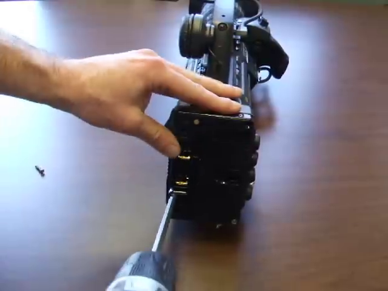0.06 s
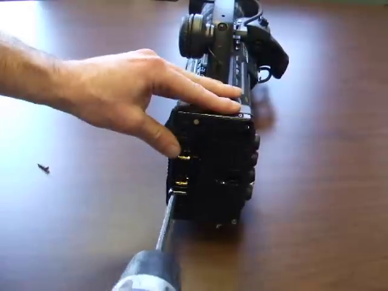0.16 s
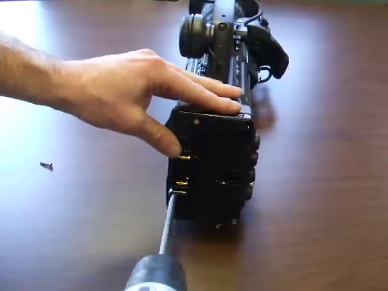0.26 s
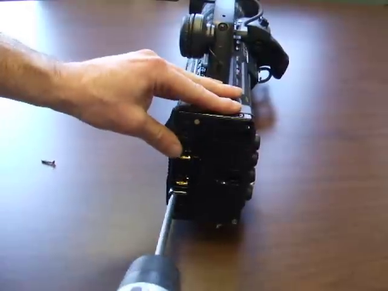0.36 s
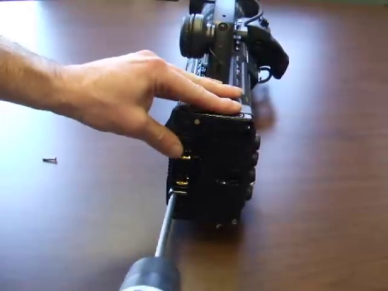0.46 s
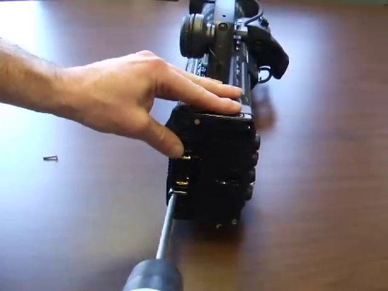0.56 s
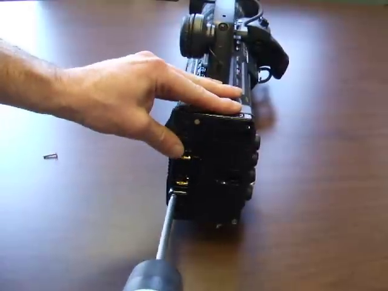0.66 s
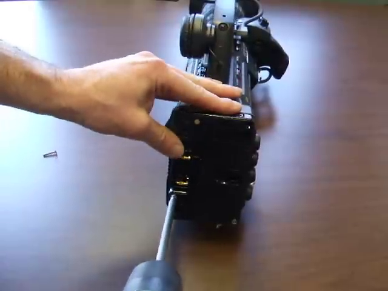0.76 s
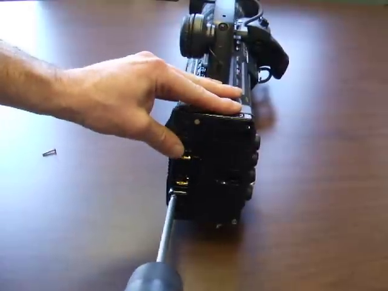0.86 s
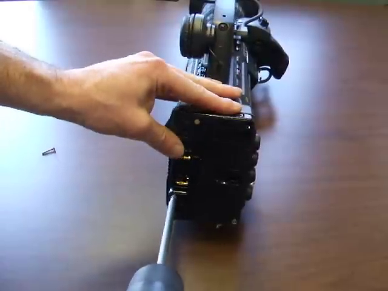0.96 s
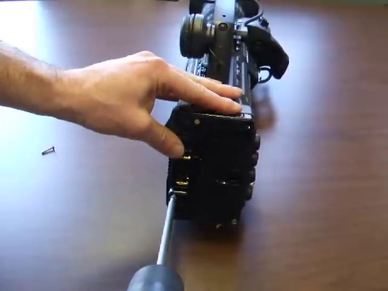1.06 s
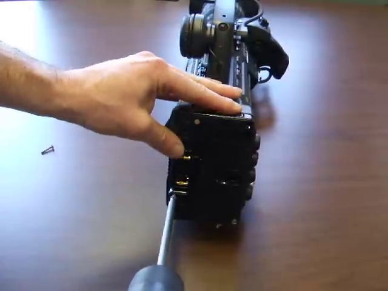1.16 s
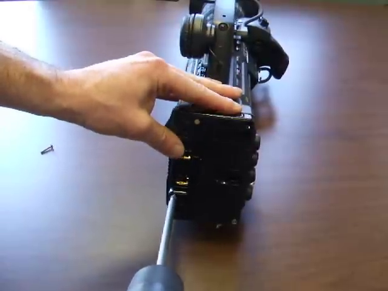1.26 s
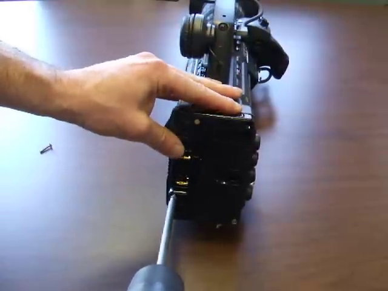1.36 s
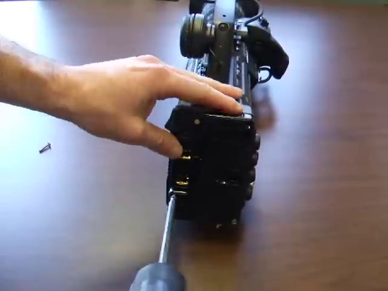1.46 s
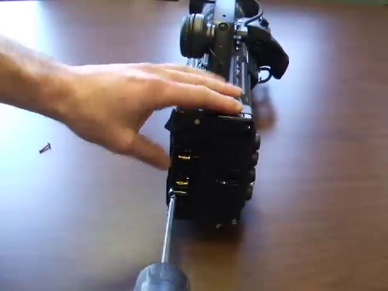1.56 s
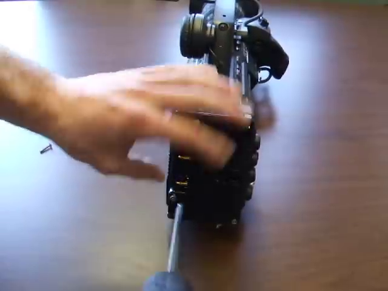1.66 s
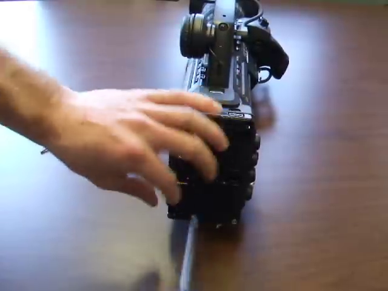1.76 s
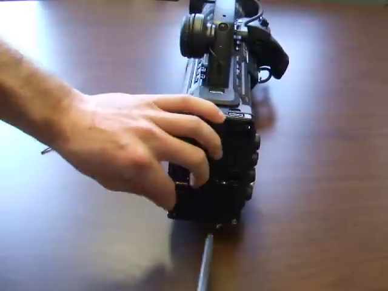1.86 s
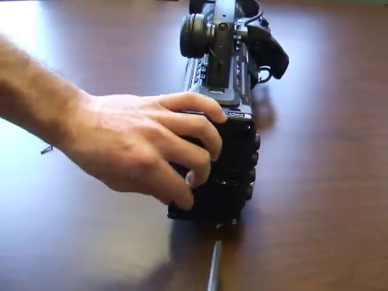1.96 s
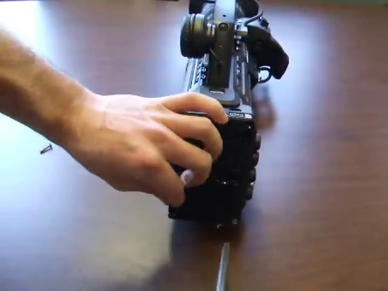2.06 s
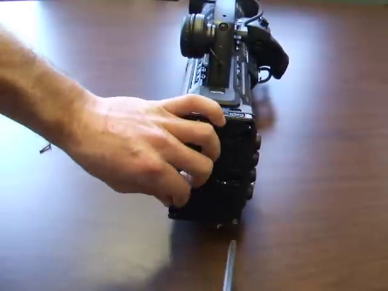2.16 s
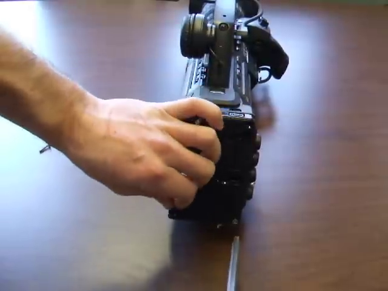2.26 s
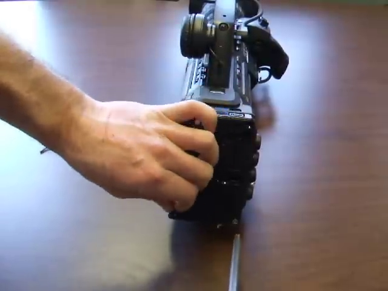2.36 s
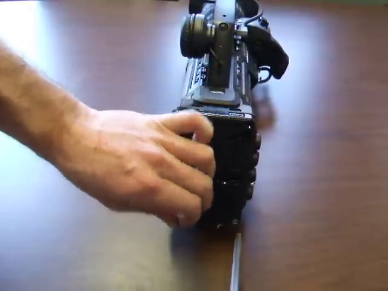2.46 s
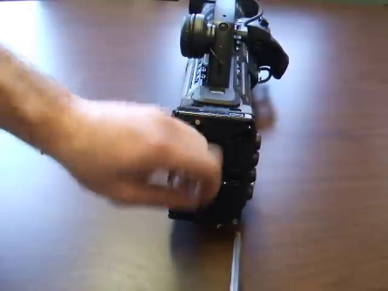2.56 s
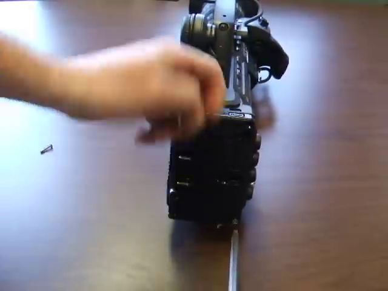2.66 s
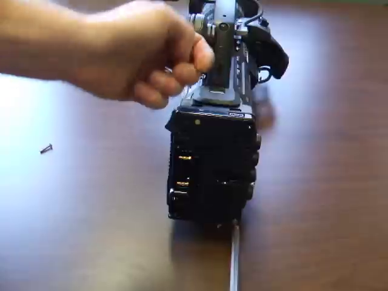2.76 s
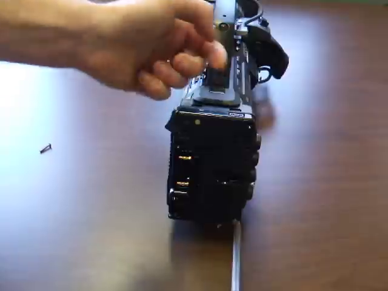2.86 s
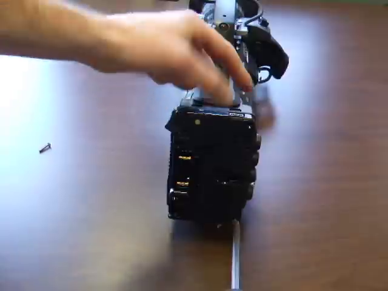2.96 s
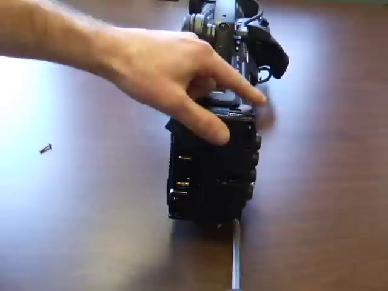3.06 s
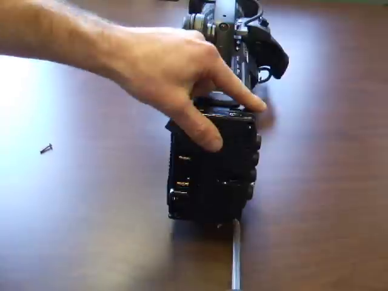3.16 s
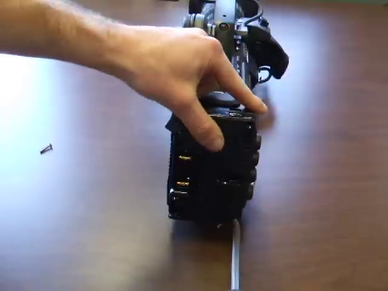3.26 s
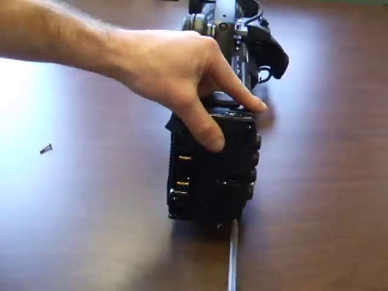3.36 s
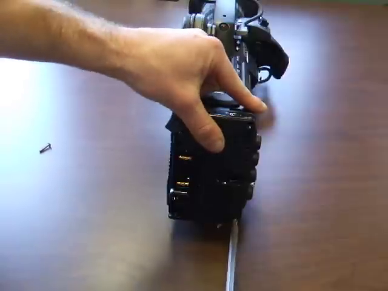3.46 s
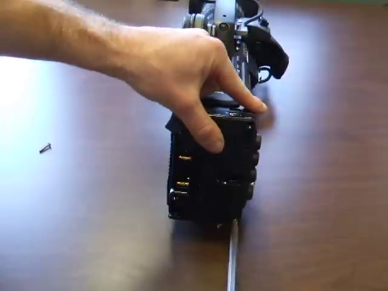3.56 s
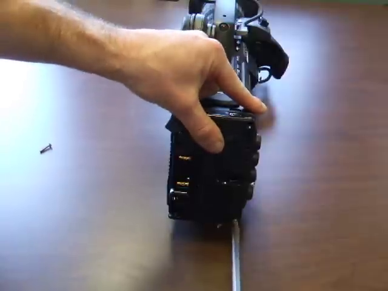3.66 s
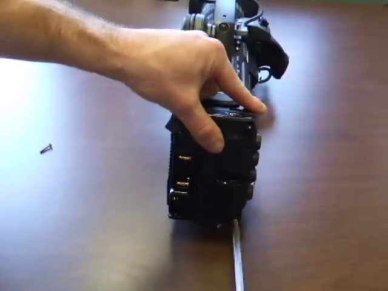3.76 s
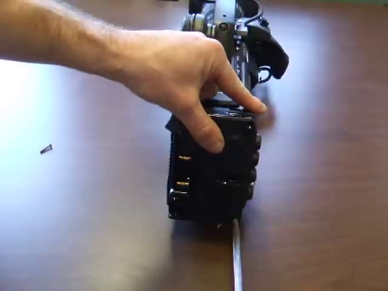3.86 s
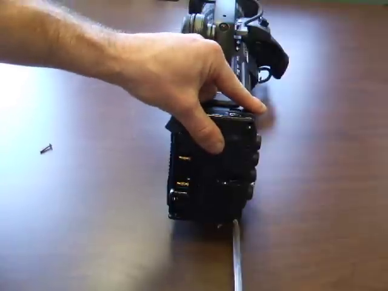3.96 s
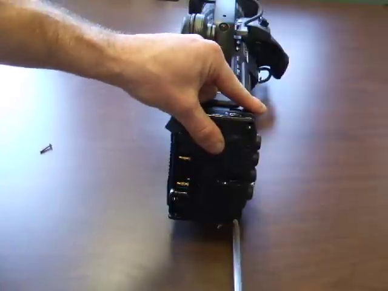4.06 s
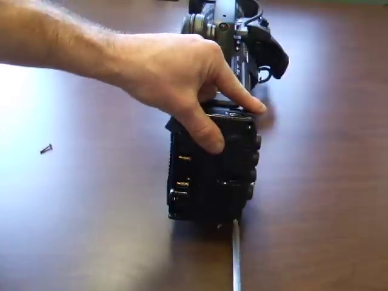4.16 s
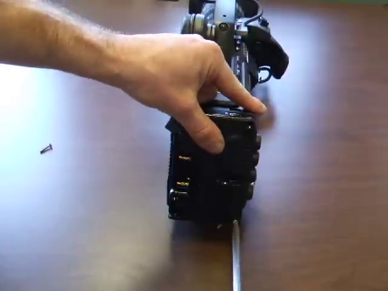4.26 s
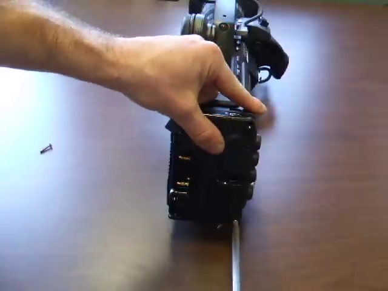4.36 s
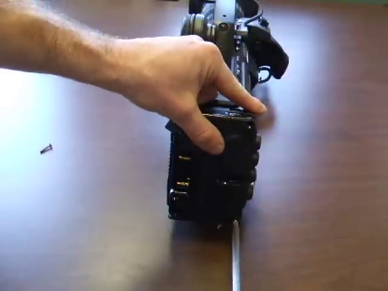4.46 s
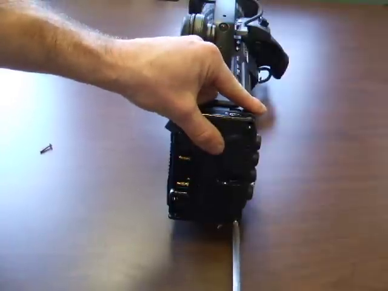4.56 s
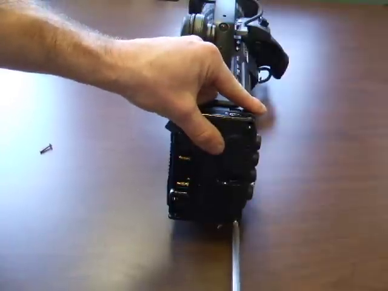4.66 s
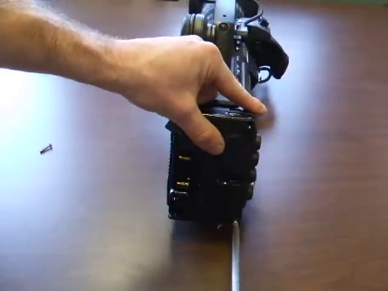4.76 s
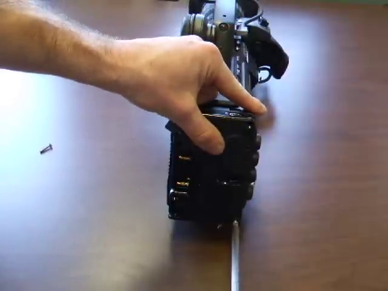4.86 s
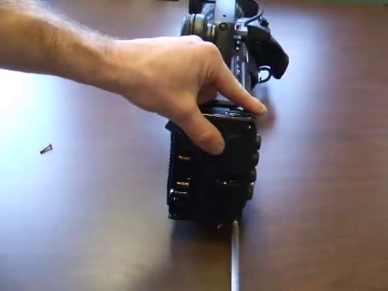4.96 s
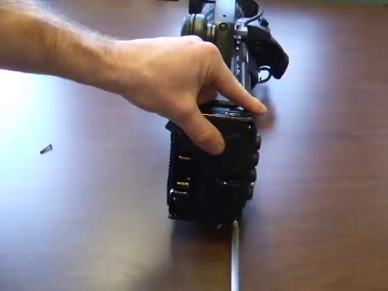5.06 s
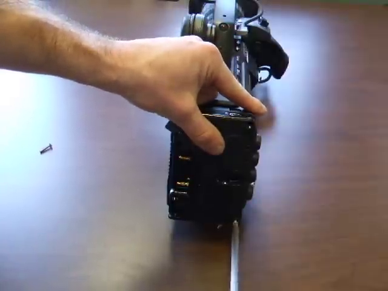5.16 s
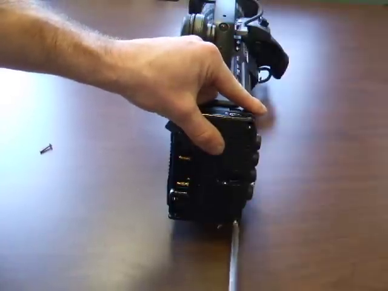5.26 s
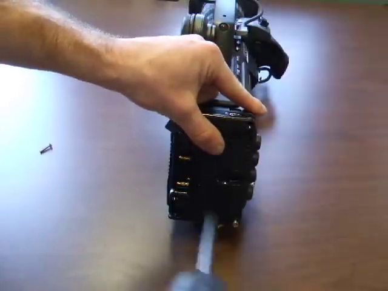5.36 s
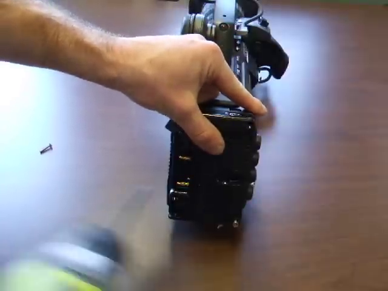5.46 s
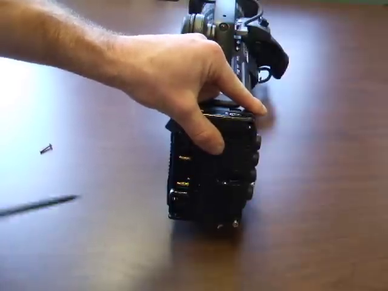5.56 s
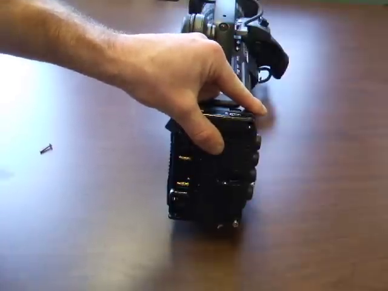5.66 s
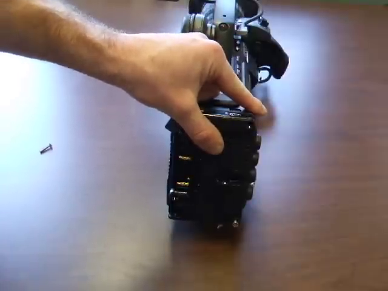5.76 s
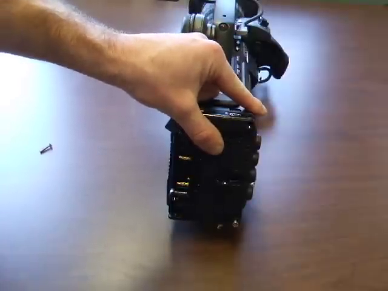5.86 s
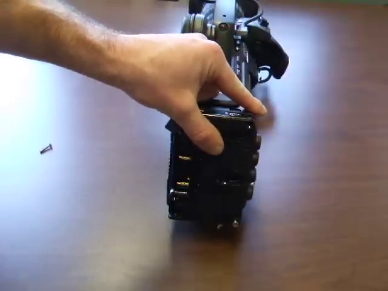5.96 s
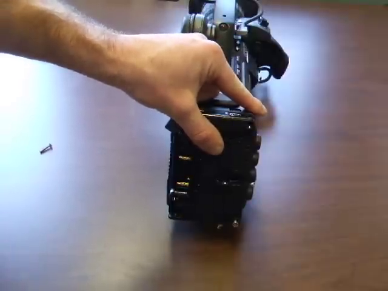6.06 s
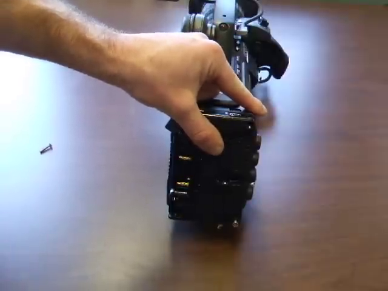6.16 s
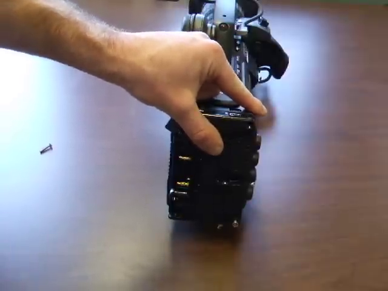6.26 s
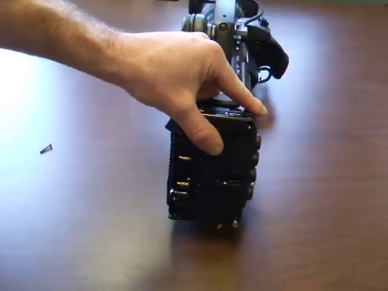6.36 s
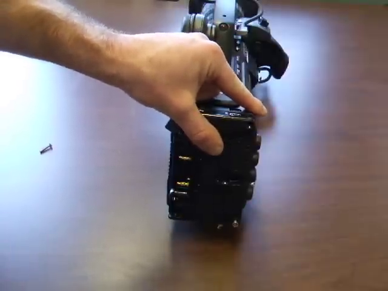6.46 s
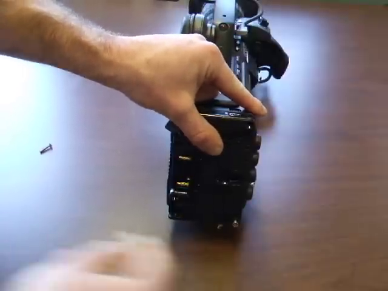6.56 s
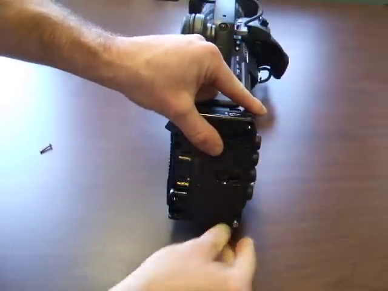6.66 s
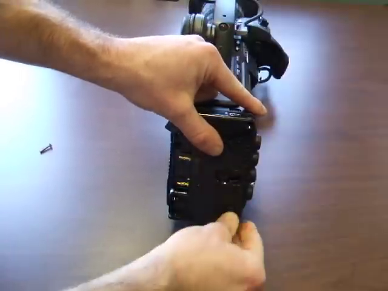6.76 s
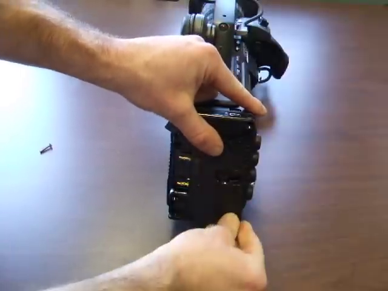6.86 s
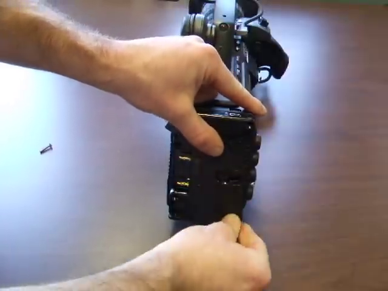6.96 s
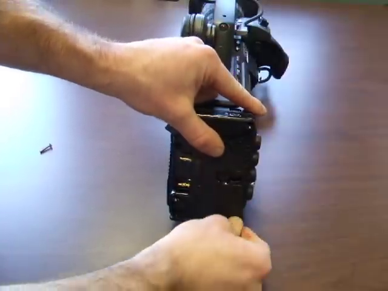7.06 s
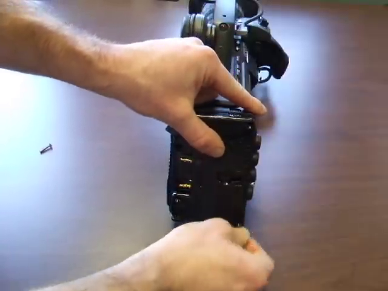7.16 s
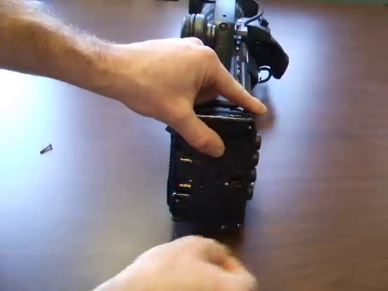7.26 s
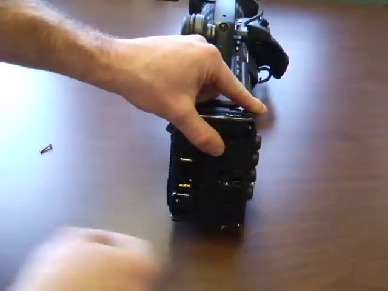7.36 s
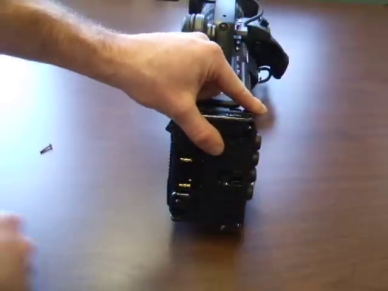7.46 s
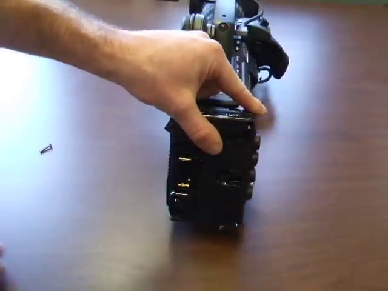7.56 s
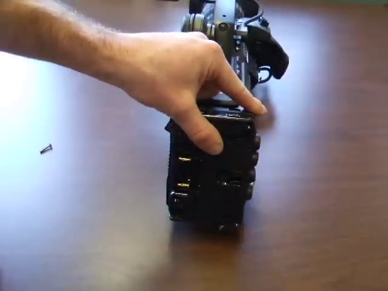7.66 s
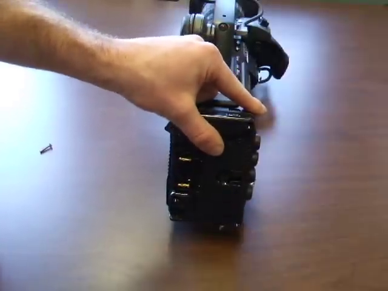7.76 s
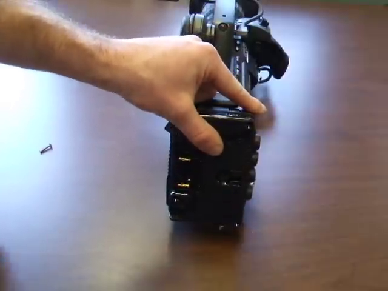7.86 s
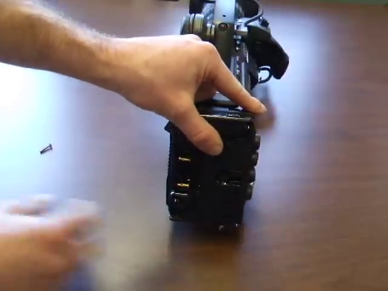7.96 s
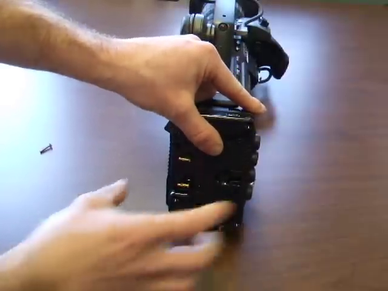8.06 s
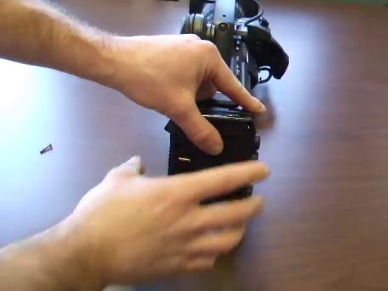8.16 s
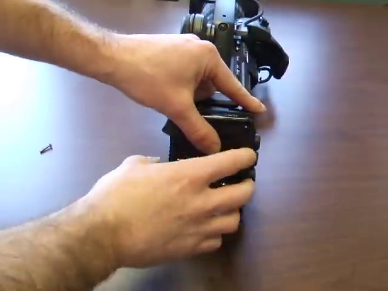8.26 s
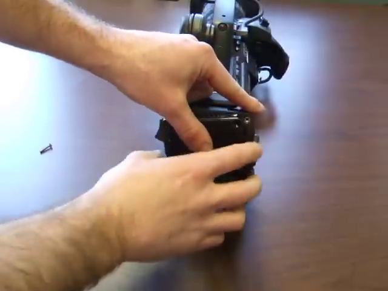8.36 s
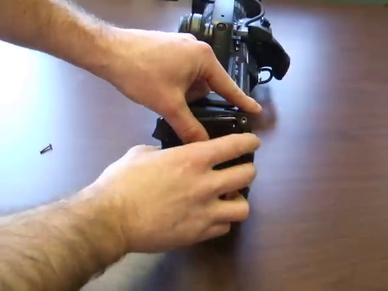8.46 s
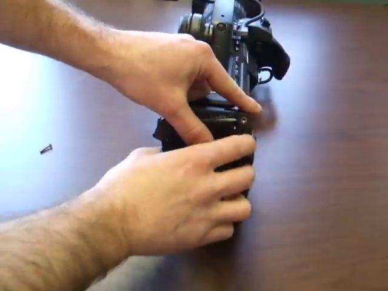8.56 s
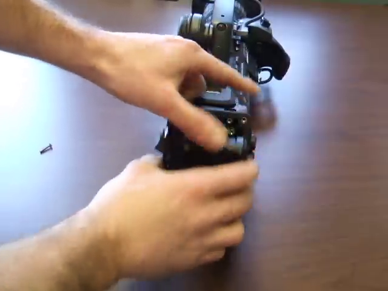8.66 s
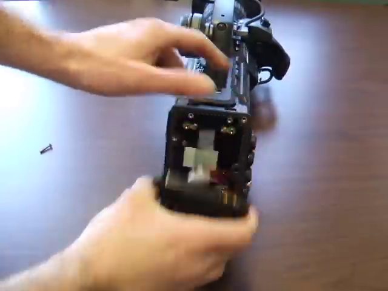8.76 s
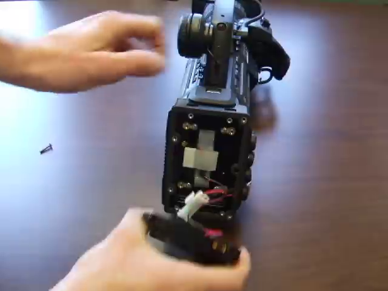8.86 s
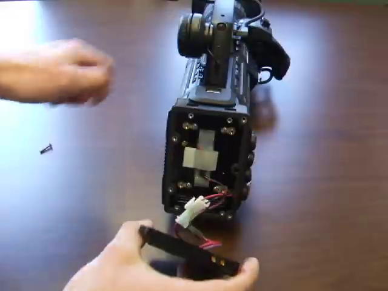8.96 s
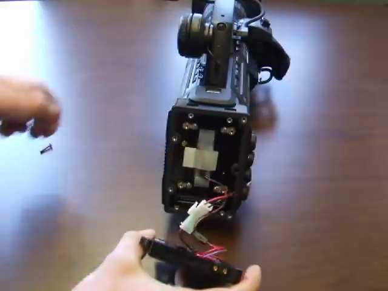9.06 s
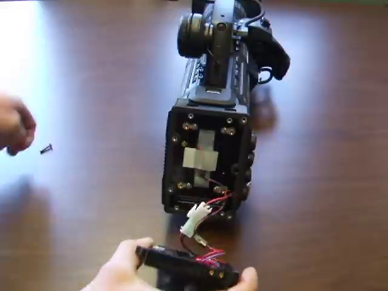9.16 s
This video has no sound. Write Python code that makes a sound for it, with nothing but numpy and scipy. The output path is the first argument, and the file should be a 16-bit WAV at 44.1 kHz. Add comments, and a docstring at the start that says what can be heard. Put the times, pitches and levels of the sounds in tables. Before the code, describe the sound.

A cordless drill whines in two short runs, backing out screws, with small metallic clicks and soft knocks between.

```python
"""A cordless drill backs two screws out of a camera's battery plate on a wooden desk, in a small room.
Its motor spins up, whines at multiples of the rotor speed and brakes hard, while rattling gear teeth
excite the resonances of the housing. Impacts of loose screws ring the plate's high modes as clicks;
knocks ring the low modes of camera and desk as thuds, and sliding friction rasps. Room air, a fan,
a thin electrical whine and a faint whistle fill the pauses."""
import sys
import numpy as np
from scipy import signal
from scipy.fft import rfft, irfft
from scipy.io import wavfile
from scipy.ndimage import uniform_filter1d

SR = 44100
rng = np.random.default_rng(int(sys.argv[2]) if len(sys.argv) > 2 else 0)


def store_wav(level_fs):
    """Save 16-bit WAV to argv[1]."""
    pcm = np.round(np.clip(np.atleast_2d(level_fs), -1, 1) * 32767)
    wavfile.write(sys.argv[1], SR, pcm.T.astype(np.int16))


N = 406591
T = np.arange(N) / SR
FREQ = np.fft.rfftfreq(N, 1 / SR) + 1e-3  # Hz, offset to keep the logarithm finite

# Spectrum of the room air: frequency_hz, gain_db
AIR_SPECTRUM = [(15, -50.5), (25, -14), (65, -9), (168, -11), (200, -16), (249, -14), (268, -14.5),
                (426, -5.5), (784, -13.5), (1630, -17), (1800, -17), (3480, -22), (7430, -21),
                (7990, -35.5), (8600, -31), (11200, -63.5), (18900, -120)]
# Humming and hissing bands of the fan: centre_hz, width_hz, level_db
FAN_BANDS = [(59, 20, -59), (372, 40, -57.5), (431, 32, -51.5), (492.5, 18, -54.5), (618, 8.9, -65.5),
             (7470, 90, -74.5), (7760, 110, -73)]
# Tones of the electrical whine: pitch_hz, level_db
WHINE_TONES = [(7854, -60.5), (7881, -82)]
# Envelope of a faint far whistle: time_s, level_db
WHISTLE_LEVELS = [(0, -66), (5.5, -69), (6.3, -60), (7.7, -57.5), (8.4, -62), (9.2, -61.5)]
# Things sliding in the hand and on the desk: start_s, length_s, level_db
SLIDES = [(3.33, 0.26, -59), (6.287, 0.16, -49.5), (6.786, 0.34, -53), (7.092, 0.11, -43),
          (7.728, 0.04, -38), (7.764, 0.07, -36.5), (7.817, .1, -50), (8.667, 0.1, -47.5)]
# Response of the wooden desk: frequency_hz, gain_db
DESK_SPECTRUM = [(30, 6.5), (65, 1), (100, 3.5), (160, 5), (210, -1), (280, 0.5), (450, -2), (800, -2.5),
                 (1400, -4), (4000, -13)]
# Knocks through camera and desk: start_s, level_db, low_edge_hz, high_edge_hz, shell_gain_db
KNOCKS = [(.227, -20, 160, 514, -7.5), (3.056, -34, 105, 300, -7), (3.36, -30, 130, 600, 0),
          (3.691, -22.5, 100, 643, 5), (6.243, -21.5, 95, 850, 1.5), (6.309, -36, 34, 130, -20),
          (8.874, -36, 250, 900, 7), (8.94, -38.5, 120, 260, -8)]
# Jolt of the drill as it brakes: level_db, low_edge_hz, high_edge_hz, shell_gain_db
BRAKE_CLUNK = (-27.5, 394, 903, 4.5)
# Resonances of the battery plate: centre_hz, width_hz, gain_db
PLATE_MODES = [(1310, 75, -13), (2030, 460, -14), (2480, 420, -12.5), (3430, 380, -15.5),
               (5190, 2200, -10.5), (6800, 280, -12)]
# Single impacts of screws, bit and plate: start_s, level_db, ping_hz, ping_gain_db
CLICKS = [(.2237, -7.5, 2280, -3), (.2342, -6, 7200, -1.5), (.2586, -10, 3330, -4), (.282, -13, 7200, -7),
          (.291, -12.5, 7600, -4), (.3167, -10.5, 4620, 2), (1.8483, -27.5, 4330, -8),
          (2.1981, -22.5, 5480, 4.5), (2.3426, -19.5, 5630, -4), (3.055, -26.5, 1390, 6),
          (3.3578, -26.5, 2460, 3), (3.375, -30, 2440, 10), (3.6886, -12.5, 1360, -14),
          (6.193, -18, 1350, -5), (6.2438, -22.5, 1140, 1), (7.016, -22, 1370, -3), (7.0218, -18, 5820, 1),
          (7.0344, -15, 5677, 3), (7.1138, -12.5, 5570, 22), (7.1601, -15.5, 6420, 5),
          (7.7875, -15.5, 7350, 4), (8.873, -19, 2680, -3), (9.0955, -31, 1590, 0)]
# A loose screw bouncing in the plate: start_s, length_s, first_gap_s, level_db, ping_hz, body_low_hz
RATTLES = [(2.299, .032, 0.011, -16, 7350, 312), (2.3997, .028, .0082, -19.5, 6040, 310),
           (7.0795, .087, .018, -20, 6250, 140)]
# Response of the drill's housing in the first run: frequency_hz, gain_db
FIRST_HOUSING = [(100, -17.5), (450, -24), (800, -18), (1080, -13), (1320, 4), (1600, -9.5), (1980, -2),
                 (2300, -9.5), (3400, -3), (4050, -3.5), (4400, -8), (6400, -1.5), (7400, 0.5),
                 (8500, -15.5)]
# Response of the housing in the second run: frequency_hz, gain_db
SECOND_HOUSING = [(100, -27.5), (450, -8.5), (850, -16), (1320, 4), (1650, -3.5), (2300, -4), (3300, -1.5),
                  (4050, -4.5), (4560, 1.5), (4850, -1.5), (5200, -5), (5800, 0.5), (6300, -4), (7450, 4),
                  (8500, -9)]
# Motor and gear tones at full speed: rotor_multiple, first_run_gain_db, second_run_gain_db
ROTOR_ORDERS = [(3, -21, -18), (4, -25, -19.5), (6, -35.5, -22.5), (9, -28, -17.5), (12, -10, -17.5),
                (14, -32.5, -29), (15, -12, -13.5), (16, -21.5, -26), (17, -20, -31), (18, -16.5, -14),
                (19, -25, -24), (20, -12.5, -23), (21, -9.5, -8.5), (22, -21, -17.5), (23, -14, -19.5),
                (24, -9, -4.5), (25, -18.5, -25)]
# Runs of the drill: start_s, screw_free_s, ease_s, brake_s, level_db, drag_decay_s, start_surge_db
DRILL_RUNS = [(.18, 0.99, 1.423, 1.468, -26, .12, 11.5), (3.967, 4.803, 5.195, 5.269, -25, .15, 14.5)]

FULL_SPEED_HZ = 313.7  # rotor turns per second
JAM_AT_S = .25  # the first screw sticks briefly
TRIGGER_LEAD_S = .033  # current flows this long before the motor turns


def undb(db):
    """Amplitude ratio of a level in decibels."""
    return 10 ** (np.asarray(db) / 20)


def unit(x):
    """Normalisation to rms 1."""
    return x / np.sqrt(np.mean(x ** 2))


def since(start_s):
    """Elapsed seconds, zero before the start."""
    return np.maximum(T - start_s, 0)


def response_db(spectrum, hz):
    """Interpolation of a spectrum on a logarithmic frequency axis."""
    points_hz, points_db = np.transpose(spectrum)
    return np.interp(np.log(hz), np.log(points_hz), points_db)


def colour(x, spectrum):
    """Filtering as multiplication in the frequency domain."""
    return irfft(rfft(x) * undb(response_db(spectrum, FREQ)), N)


def noise_band(centre_hz, width_hz):
    """White noise filtered by one spectral peak, rms 1."""
    return unit(irfft(rfft(rng.standard_normal(N)) / (1 + (2 * (FREQ - centre_hz) / width_hz) ** 2), N))


def drift(rate_hz):
    """Random fluctuation: low-pass noise, rms 1."""
    return noise_band(0, 2 * rate_hz)


def resonate(x, centre_hz, width_hz):
    """Second-order resonance, gain 1 at its centre."""
    return signal.lfilter(*signal.iirpeak(centre_hz, centre_hz / width_hz, SR), x)


def add(out, start_s, x):
    """Superposition of a short sound on a longer one."""
    i = int(start_s * SR)
    out[i:i + len(x)] += x[:N - i]


def room(x, wet_db, bass_t60_s=.67, treble_t60_s=.19):
    """Reverberation: wall reflections arrive after 5 ms and decay, the treble soonest."""
    t = T[:SR]
    noise = rng.standard_normal(SR)
    bass = signal.sosfilt(signal.butter(1, 2000, fs=SR, output="sos"), noise)
    tail = bass * undb(-60 * t / bass_t60_s) + (noise - bass) * undb(-60 * t / treble_t60_s)
    tail *= t > .005
    return x + undb(wet_db) * signal.fftconvolve(x, tail / np.linalg.norm(tail))[:N]


def background(air_db=-48, whistle_hz=1831):
    """Superposition of broadband air, narrow-band fan noise, an electrical whine and a faint whistle."""
    air = unit(colour(rng.standard_normal(N), AIR_SPECTRUM)) * undb(air_db + 1.05 * drift(2.5))
    fan = sum(undb(db) * noise_band(hz, width_hz) for hz, width_hz, db in FAN_BANDS)
    whine = sum(undb(db) * np.sqrt(2) * np.sin(2 * np.pi * hz * T) for hz, db in WHINE_TONES)
    whistle = np.sqrt(2) * np.sin(2 * np.pi * np.cumsum(whistle_hz + 14 * drift(36)) / SR)
    whistle_db = np.interp(T, *np.transpose(WHISTLE_LEVELS))
    return air + fan + whine + undb(whistle_db) * whistle


def slides(grain_db=4):
    """Sliding friction: gritty noise swells and fades over each stroke."""
    level = sum(undb(db) * np.sqrt(np.maximum(1 - (2 * (T - start_s) / length_s - 1) ** 2, 0))
                for start_s, length_s, db in SLIDES)
    grit = rng.standard_normal(N) * undb(grain_db * drift(190))
    spectrum = [(300, -1.5), (1200, -4.5), (2500, 3), (5000, 6.5), (8000, 3), (10000, -32)]
    return level * unit(colour(grit, spectrum))


def thuds(hits, shell_hz=1200, shell_t60_s=.099):
    """Damped vibration: a knock rings the desk's dense low modes, and the camera's shell clacks."""
    out, t = np.zeros(N), T[:SR]
    desk = colour(rng.standard_normal(N), DESK_SPECTRUM)
    attack = 1 - np.exp(-t / .00044)
    for start_s, db, low_hz, high_hz, shell_db in hits:
        wood = desk[rng.integers(N - SR):][:SR]
        t60_s = .43 * (100 / low_hz) ** .72  # higher knocks die sooner
        low = signal.sosfilt(signal.butter(2, [low_hz, high_hz], "bandpass", fs=SR, output="sos"), wood)
        shell = resonate(wood, shell_hz, shell_hz / 2) + resonate(wood, 3100, 210)
        thud = low * undb(-60 * t / t60_s) + undb(shell_db) * shell * undb(-60 * t / shell_t60_s)
        add(out, start_s, undb(db) * thud * attack / (2.68 * np.std(thud[:SR // 20])))
    return out


def clicks(hits, contact_s=.0015, t60_s=.016, crack_db=-19):
    """Impact excitation: a brief scrape rings the plate's modes, and each contact adds its own ping."""
    out, t = np.zeros(N), T[:SR // 10]
    fade = undb(-60 * np.maximum(t - contact_s, 0) / t60_s)
    for start_s, db, ping_hz, ping_db in hits:
        force = rng.choice([-1, 1], len(t)) * fade
        # hard metal contacts favour the high modes, plastic ones the low
        tilt_db_per_octave = 4 * np.log2(ping_hz / 3500)
        plate = sum(undb(gain_db + tilt_db_per_octave * np.log2(hz / 3500)) * resonate(force, hz, width)
                    for hz, width, gain_db in PLATE_MODES)
        ping = undb(ping_db - 13) * fade * np.sin(2 * np.pi * ping_hz * t)
        click = plate + undb(crack_db) * force + ping
        add(out, start_s, undb(db) * click / (2.44 * np.std(click[:SR // 300])))
    return out


def screw_bounces(restitution=.86, scatter_db=2.5, detune=.057):
    """Inelastic bouncing: ever quicker impacts, listed as pings of the plate and nudges of the body."""
    pings, nudges = [], []
    for start_s, length_s, gap_s, level_db, ping_hz, body_hz in RATTLES:
        delays = np.cumsum(np.r_[0, gap_s * restitution ** np.arange(10)])
        levels = level_db + scatter_db * rng.standard_normal(len(delays))
        pitches = ping_hz * (1 + detune * rng.standard_normal(len(delays)))
        for delay_s, db, hz in zip(delays, levels, pitches):
            if delay_s < length_s:
                pings.append((start_s + delay_s, db, hz, 1.5))
                nudges.append((start_s + delay_s, db - 22, body_hz, 2 * body_hz, -6))
    return pings, nudges


def camera_rumble(speed, torque, loose, kick_db=-35, wobble_db=-41.5):
    """Forced vibration: the camera body shakes as the motor speeds up, and under a loose screw."""
    level = speed * (undb(kick_db) * np.maximum(torque, 0) + undb(wobble_db) * loose ** 2)
    shake = rng.standard_normal(N) * undb(1.8 * drift(25))
    return level * unit(colour(shake, [(50, -30.5), (130, 2.5), (240, -6), (400, -5.5), (900, -50)]))


def current_pulse(start_s, length_s=.053):
    """Switching transient: current swells briefly as the trigger closes, just ahead of the motor."""
    return np.sin(np.pi * np.minimum(since(start_s - TRIGGER_LEAD_S) / length_s, 1)) ** 2


def trigger_squeal(start_s, settled_hz=5270, drop_hz=2000, drop_s=.009, level_db=-34.5):
    """Current chopping: the speed control sings at each pull, its pitch settling from above."""
    hz = settled_hz + drop_hz * np.exp(-since(start_s - TRIGGER_LEAD_S) / drop_s)
    hz *= 1 + .0048 * drift(93)
    return undb(level_db) * current_pulse(start_s) * np.sin(2 * np.pi * np.cumsum(hz) / SR)


def motor_speed(start_s, ease_s, brake_s, drag_decay_s, spin_lag_s=.029, brake_lag_s=.038):
    """First-order lag under load: the share of full speed from spin-up to braking."""
    spin_up = 1 - np.exp(-since(start_s) / spin_lag_s)
    thread_drag = .22 * np.exp(-since(start_s) / drag_decay_s)
    jam = .55 * np.exp(-(np.minimum(T - JAM_AT_S, 0) / .022) ** 2 - since(JAM_AT_S) / .04)
    finger_lift = np.maximum(1 - 1.05 * since(ease_s), 0)
    braking = np.exp(-since(brake_s) / brake_lag_s)
    return spin_up * (1 - thread_drag) * (1 - jam) * finger_lift * braking


def gear_tones(run, housing, speed, rotor_hz, angle):
    """Rotational harmonics: each tone swells as its glide crosses a resonance of the housing."""
    tones = 0
    for order, *gains_db in ROTOR_ORDERS:
        swell_db = response_db(housing, order * rotor_hz) - response_db(housing, order * FULL_SPEED_HZ)
        waver_db = (.6 + order / 18) * drift(18)
        phase = order * angle + rng.uniform(0, 2 * np.pi)
        tones += undb(gains_db[run] + swell_db + waver_db) * np.sin(phase)
    return tones * np.sqrt(2) * speed ** 5  # the gears sing cleanly only near full speed


def gear_rattle(housing, angle, depth=.084, grain_db=1.5):
    """Amplitude modulation: teeth strike harder as each planet gear comes round, and once a turn."""
    mesh = 1 + depth * np.cos(.847 * angle) + depth / 2 * np.cos(angle)
    return unit(colour(rng.standard_normal(N) * mesh * undb(grain_db * drift(350)), housing))


def motor_strain(torque, rotor_hz, angle, growl_db, pinion_db):
    """Torque reaction: three rotor poles and the pinion tug at the housing as the speed changes."""
    growl = np.exp(-((rotor_hz - 175) / 55) ** 2) * (np.sin(3 * angle) + .6 * np.sin(9 * angle))
    pinion = np.exp(-((rotor_hz - 260) / 45) ** 2) * np.sin(12 * angle)
    return np.abs(torque) * (undb(growl_db) * growl + undb(pinion_db) * pinion)


def drill(run, housing, rattle_db, growl_db, pinion_db, hum_db=-18, buzz_db=-13.5):
    """Rotating machinery: one rotor angle drives the tones, rattle, strain and hum of a run."""
    start_s, free_s, ease_s, brake_s, level_db, drag_decay_s, start_surge_db = DRILL_RUNS[run]
    speed = motor_speed(start_s, ease_s, brake_s, drag_decay_s)
    loose = (1 + np.tanh((T - free_s) / .32)) / 2  # rises from 0 to 1 as the screw works free
    judder = (.00079 + .0396 * (1 - speed)) * drift(29.6)  # greater while the rotor is held back
    rotor_hz = np.maximum(FULL_SPEED_HZ * speed * (1 + judder), 1)
    angle = 2 * np.pi * np.cumsum(rotor_hz) / SR
    acceleration = uniform_filter1d(np.gradient(FULL_SPEED_HZ * speed) * SR, size=500)
    torque = np.tanh(acceleration / 900)

    tones = gear_tones(run, housing, speed, rotor_hz, angle)
    rattle = undb(rattle_db) * gear_rattle(housing, angle)
    strain = motor_strain(torque, rotor_hz, angle, growl_db, pinion_db)
    hum = undb(hum_db) * (1 - loose) * np.sin(angle)  # rotor imbalance, passed on while the screw grips

    surge_db = start_surge_db * np.exp(-since(start_s) / .075) + 5.5 * (T > brake_s)
    jam_dip_db = -4.5 * (T > JAM_AT_S) * np.exp(-since(JAM_AT_S) / .068)
    running = speed ** 1.06 * undb(surge_db + jam_dip_db)
    buzzing = undb(buzz_db) * current_pulse(start_s)  # the speed control hisses as current flows, before the motor turns
    machine = undb(level_db) * (running + buzzing) * (tones + rattle + strain + hum)
    return machine + trigger_squeal(start_s) + camera_rumble(speed, torque, loose)


def scene():
    """Superposition: two runs of the drill and the handling reverberate over the background."""
    first = drill(0, FIRST_HOUSING, rattle_db=-2, growl_db=-4, pinion_db=-8)
    second = drill(1, SECOND_HOUSING, rattle_db=-1, growl_db=-3, pinion_db=-5.5)
    tool = room(first + second, wet_db=-13.5)
    pings, nudges = screw_bounces()
    clunks = [(brake_s + .0095, *BRAKE_CLUNK) for _, _, _, brake_s, *_ in DRILL_RUNS]
    handling = room(clicks(CLICKS + pings) + thuds(KNOCKS + clunks + nudges) + slides(), wet_db=-10.5)
    return (tool + handling + background())[None]


def record(dry, sampling_hz=16000, top_hz=8170):
    """Spectral imaging: slow sampling mirrors the highest tones about the band edge; the top is cut."""
    in_band = signal.sosfilt(signal.ellip(12, .1, 80, sampling_hz / 2 - 50, fs=SR, output="sos"), dry)
    mirrored = in_band * (1 + 2 * np.cos(2 * np.pi * sampling_hz * T))
    return signal.sosfilt(signal.butter(36, top_hz, fs=SR, output="sos"), mirrored)


dry = scene()
out = record(dry)
store_wav(out)
```